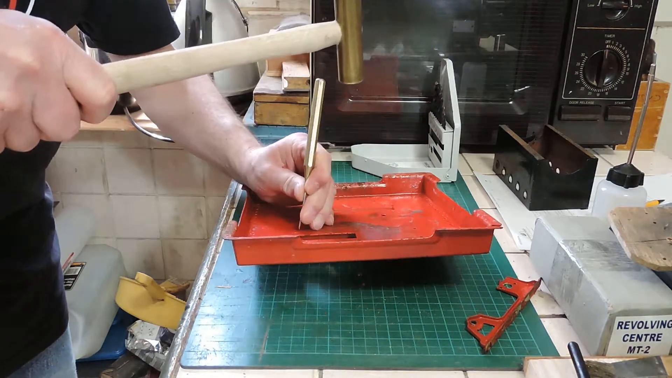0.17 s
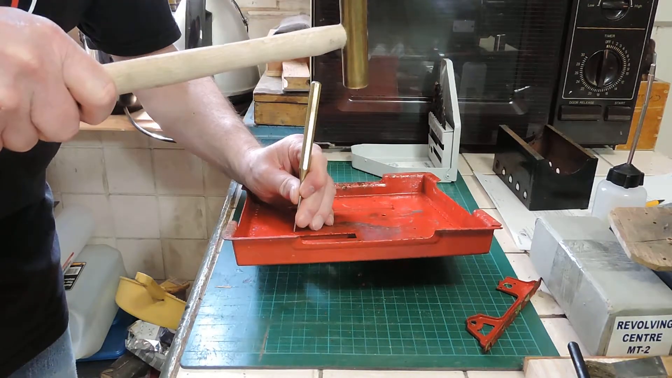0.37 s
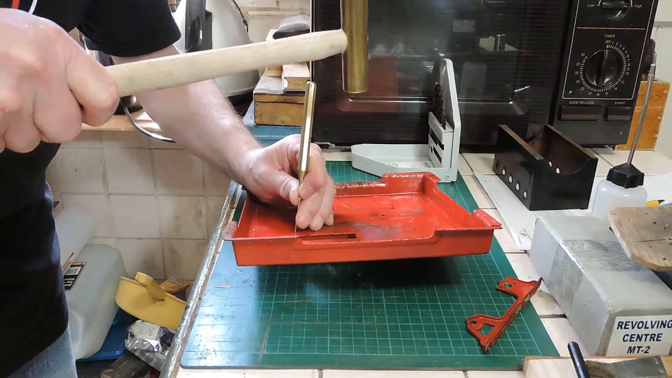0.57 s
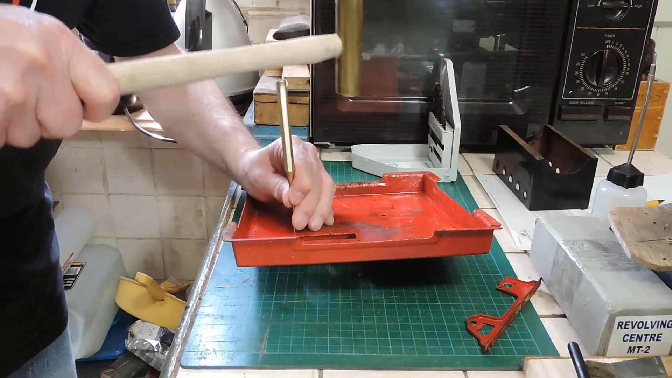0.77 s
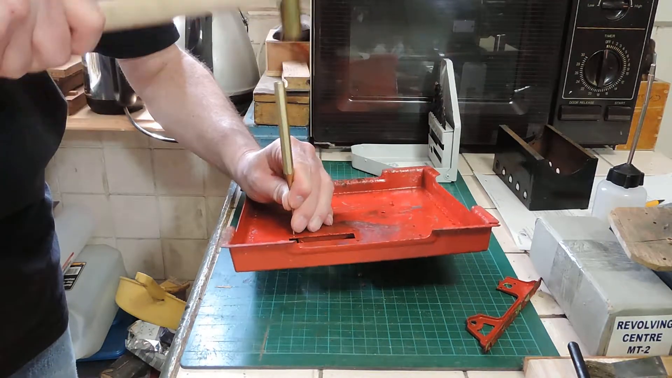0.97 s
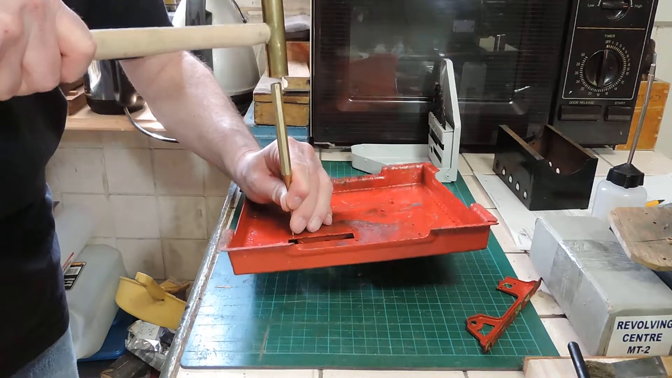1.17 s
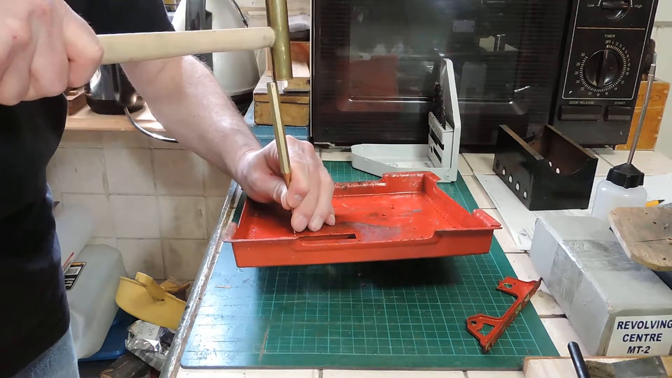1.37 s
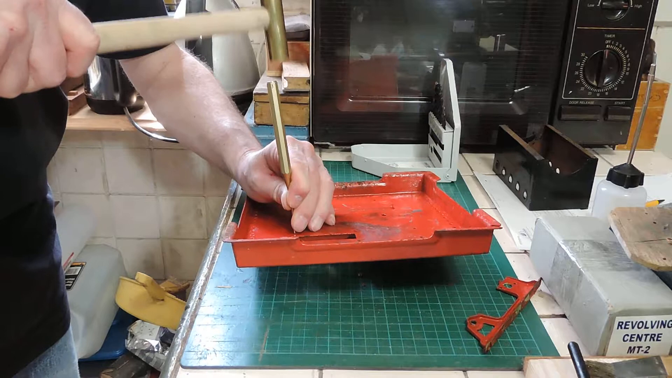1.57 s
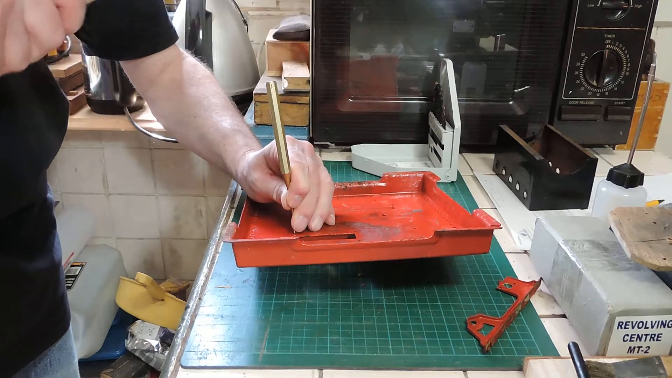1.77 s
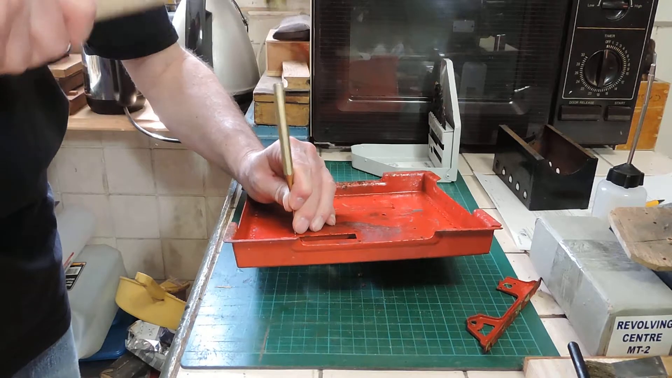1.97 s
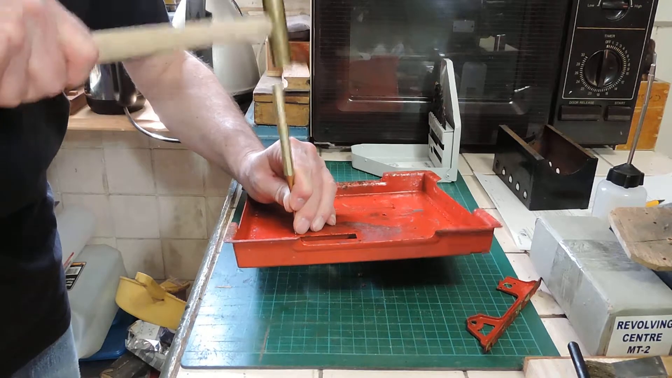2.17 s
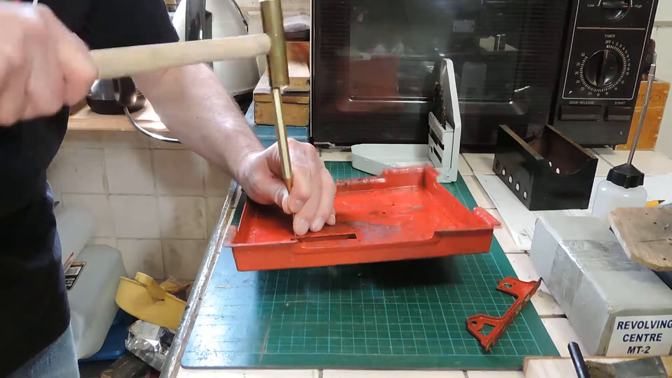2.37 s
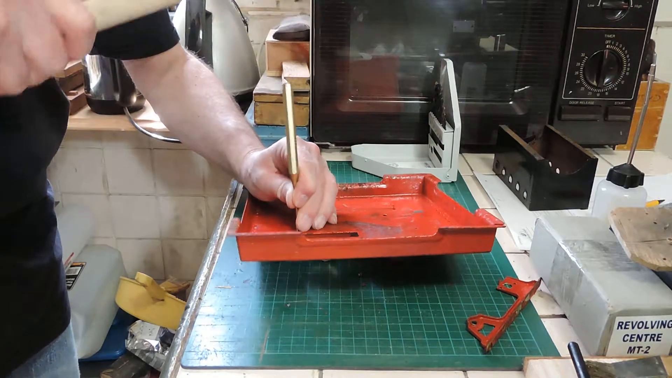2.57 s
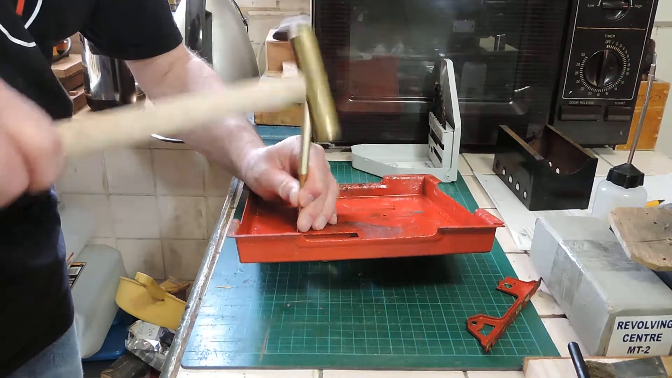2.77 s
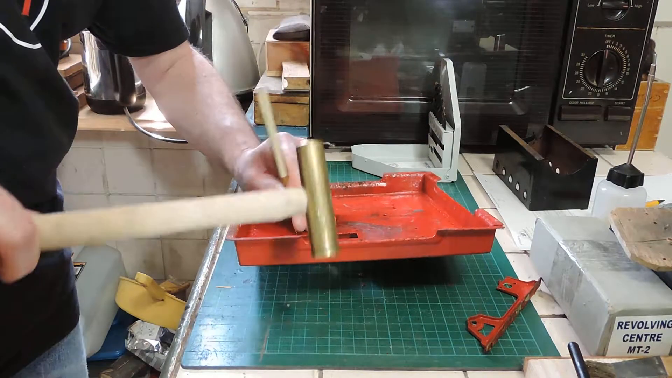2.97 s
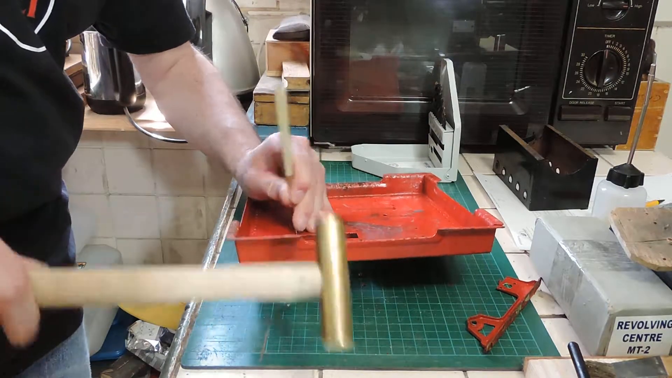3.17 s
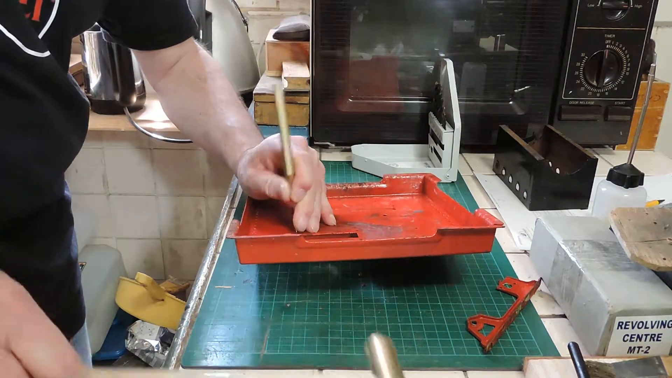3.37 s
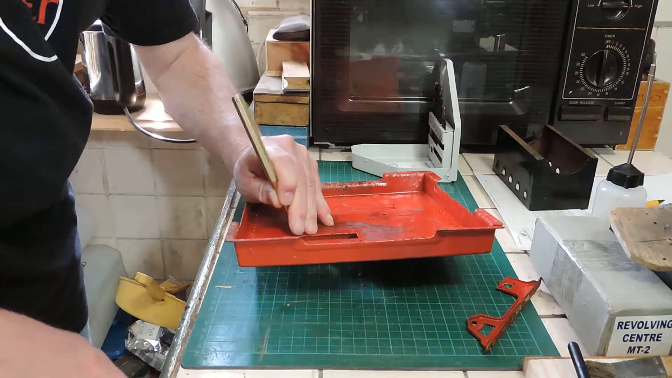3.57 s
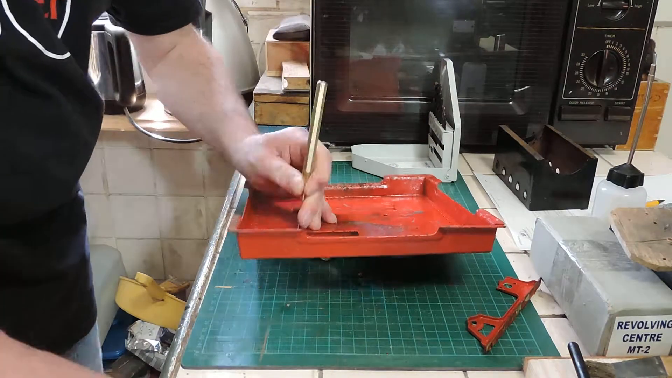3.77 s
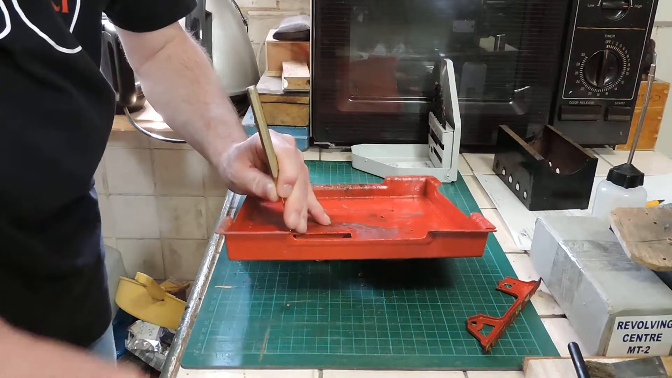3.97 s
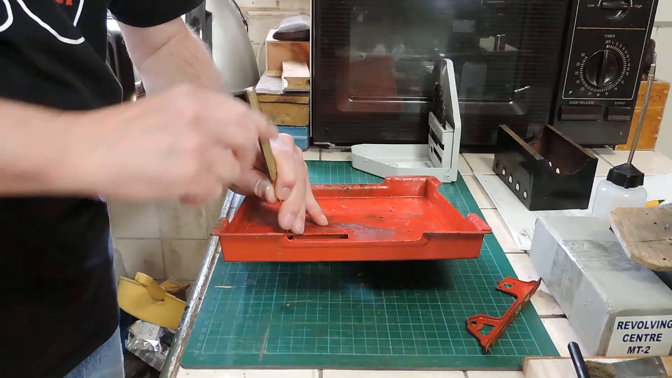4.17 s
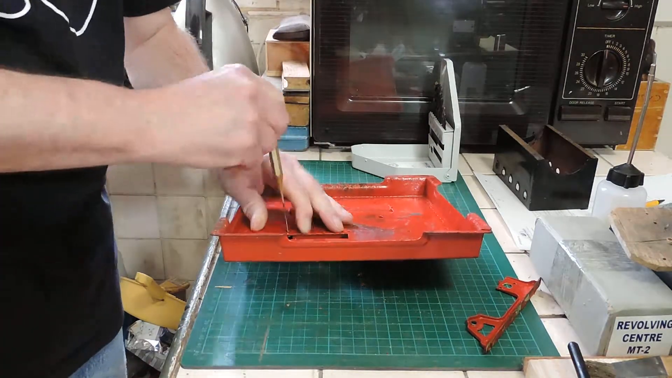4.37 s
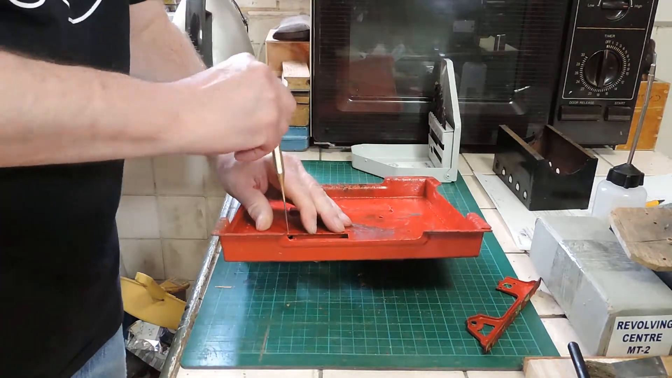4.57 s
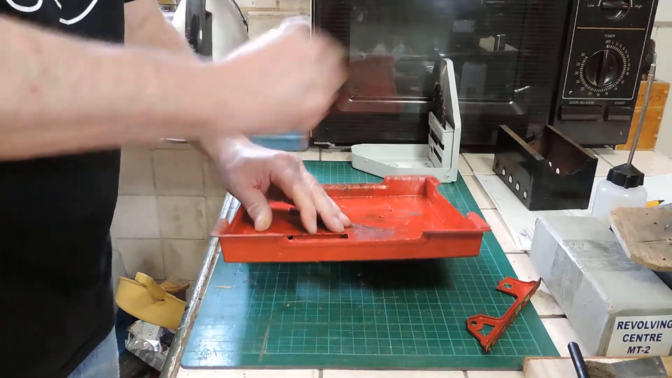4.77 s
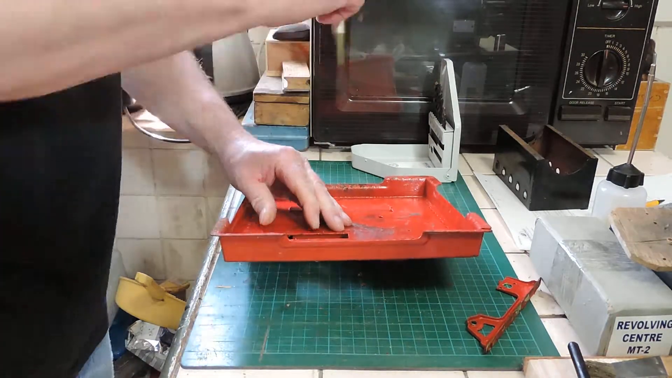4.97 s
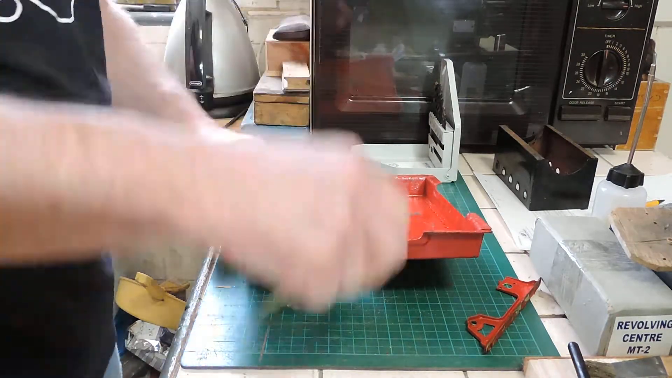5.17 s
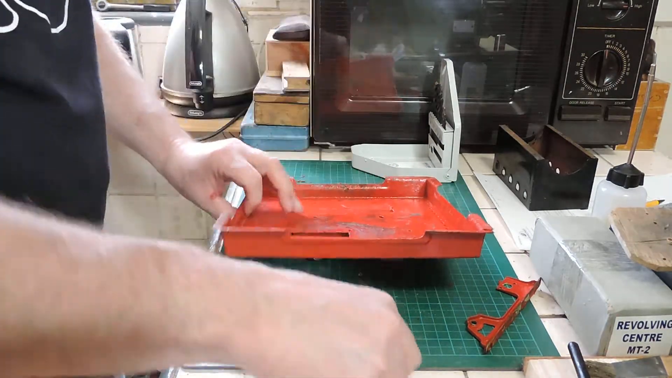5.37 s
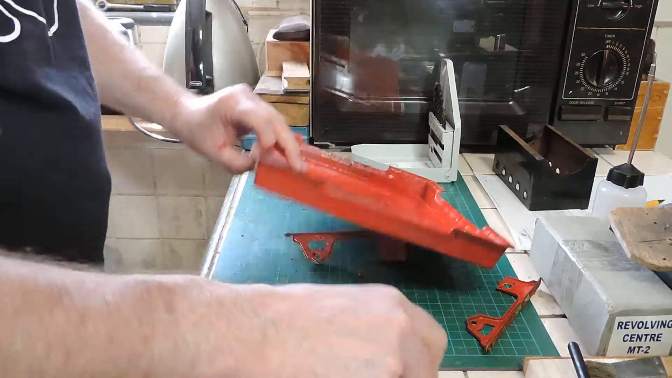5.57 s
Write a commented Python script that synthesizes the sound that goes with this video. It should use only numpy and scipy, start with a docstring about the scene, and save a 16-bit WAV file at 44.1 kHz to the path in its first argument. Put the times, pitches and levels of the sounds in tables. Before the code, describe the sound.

A close, slightly compressed camera pickup in a small workshop, with faint low rumble and soft hiss throughout. The first second is almost empty; a barely audible tick comes at 1.0 s and a light hammer tap on a punch at 1.4. Three hard blows follow at 2.0, 2.27 and 2.5 s: bright, clanging cracks with a noisy thin-metal tray rattle, short ring and quick room reflection, the last drier. The recording level ducks, then creeps back. Faint bumps at 3.2 lead to a loud, rapid cluster of hard tray knocks at 3.7-3.77 s. At about 4.14 s the hammer is laid down with a hollow, mid-low thunk and a brief follow-up clatter. Faint scrapes and small ticks run from 4.1 to 4.75. At 4.91 the tray drops on the mat, dull and boomy, with a second bump. From 5.52 s the loose punch bounces in thin, high, glassy clinks as rumble rises slightly.

```python
"""A tray knocks on a workshop bench, then a hammer taps a punch once lightly and three times hard to drive a rivet out.
The tray knocks as the punch is worked loose, the hammer is laid down, metal scrapes, the freed tray drops
on a mat, and the punch clinks down. Bursts of noise ring the metal parts, and a small room answers.
Rumble and hiss run throughout; the camera's gain sinks after loud treble and creeps back."""
import sys
import numpy as np
from scipy import signal
from scipy.fft import rfft, irfft, next_fast_len
from scipy.io import wavfile
from scipy.ndimage import uniform_filter1d, minimum_filter1d

SR = 44100
rng = np.random.default_rng(int(sys.argv[2]) if len(sys.argv) > 2 else 0)


def store_pcm(level_fs):
    """Save levels as 16-bit WAV."""
    pcm = np.round(np.clip(level_fs, -1, 1) * 32767).astype(np.int16)
    wavfile.write(sys.argv[1], SR, np.atleast_2d(pcm).T)


N = 246958
AGE = np.arange(SR // 2) / SR  # time since a contact began [s]
# ringing tones of the tray: (frequency [Hz], relative level [dB])
TRAY_TONES = [(124, 1), (150, -1), (215, -4), (312, -3), (400, -4), (485, -1), (580, -4), (796, 1),
              (846, 0), (1126, 4), (1198, 1), (1308, 1), (1402, 4), (1470, 2), (1620, -3), (1730, 1),
              (2020, 1), (2470, 0), (2715, -2), (3000, -2), (3321, -8)]


def amp(db):
    """Turn decibels into a gain factor."""
    return 10 ** (np.asarray(db) / 20)


def unit(x):
    """Scale a sound to an rms level of 1."""
    return x / np.sqrt(np.mean(x ** 2) + 1e-20)


def unit_attack(x):
    """Scale a hit so that its first 40 ms have an rms level of 1."""
    attack = x[..., :SR // 25]
    return x / np.sqrt(np.mean(attack ** 2) + 1e-20)


def along(points, hz):
    """Read a curve of (frequency, value) points, with straight lines on a log frequency axis."""
    point_hz, values = np.transpose(points)
    return np.interp(np.log(hz + 1), np.log(point_hz), values)


def fade(t60):
    """A dying-away curve that loses 60 dB in t60 seconds."""
    return np.exp(-np.log(1000) * AGE / max(t60, 1e-4))


def add(track, s, sound):
    """Mix a sound into the track, starting at s seconds."""
    space = track[:, round(s * SR):][:, :sound.shape[1]]
    space += sound[:, :space.shape[1]]


def through(x, response):
    """Pass each channel through an impulse response."""
    return signal.fftconvolve(x, response[None], axes=1)[:, :x.shape[1]]


def colour(spectrum, size=8192):
    """Build an impulse response with the wanted gain at each frequency and no sound before the hit."""
    gain = amp(along(spectrum, np.fft.rfftfreq(size, 1 / SR)))
    # folding the cepstrum (spectrum of the log gain) gathers the energy at the start
    cepstrum = irfft(np.log(gain))
    cepstrum[1:size // 2] *= 2
    cepstrum[size // 2 + 1:] = 0
    return irfft(np.exp(rfft(cepstrum)))[:size // 2]


def resonator(modes, t60):
    """Ring like struck metal or a mat: a sum of sine tones that die away together."""
    age = AGE[:SR // 6]
    tones = sum(amp(db) * np.sin(2 * np.pi * hz * age) for hz, db in modes)
    return tones * fade(t60)[:len(age)]


def diffuse(size):
    """White stereo noise whose channels differ by an amount that depends on frequency."""
    # stereo width: (frequency [Hz], side over middle [dB])
    stereo_width = [(60, -4), (150, -10.5), (600, -8), (1200, -4.5), (3000, 0), (10000, -1.5)]
    m = next_fast_len(size)
    mid, side = rng.standard_normal((2, m))
    side_gain = amp(along(stereo_width, np.fft.rfftfreq(m, 1 / SR)))
    side = irfft(rfft(side) * side_gain, m)
    return unit(np.array([mid + side, mid - side])[:, :size])


def room_tail():
    """The room's answer: it builds in a few ms and each frequency dies at its own speed."""
    # room decay: (frequency [Hz], time to lose 60 dB [s])
    room_decay = [(100, 0.43), (400, 0.27), (1500, 0.28), (5000, 0.26), (14000, 0.28)]
    hz, t, grains = signal.stft(diffuse(len(AGE)), SR, nperseg=256)
    decay = np.exp(-np.log(1000) * t / along(room_decay, hz)[:, None])
    tail = signal.istft(grains * decay, SR, nperseg=256)[1]
    return tail[:, :len(AGE)] * (1 - fade(0.006))


def contact(rattle_t60, crack_db, room_db):
    """The push of a contact: a sharp noise crack, a dense noisy rattle and the room's answer."""
    crack = amp(crack_db) * fade(0.0055) * rng.standard_normal(len(AGE))
    rattle = fade(rattle_t60) * diffuse(len(AGE))
    return crack + rattle + amp(room_db) * room_tail()


def cushioned(hit, db):
    """A weak contact lasts longer and is duller: its treble rolls off from a lower frequency."""
    # 8730 Hz at a level of 0 dB, and an octave lower for every 18 dB weaker
    corner_hz = np.clip(8730 * 2 ** (db / 18), 500, 16000)
    return signal.sosfilt(signal.butter(2, corner_hz, fs=SR, output='sos'), hit)


def voiced(hit, thud_db, edge_db, sizzle_db):
    """A heavy contact adds thud, a hard one edge and sizzle, relative to the middle band."""
    # thud, middle, edge and sizzle bands: (lowest frequency [Hz], highest frequency [Hz])
    band_edges = [(30, 350), (350, 3800), (3800, 9000), (9000, 17000)]
    out = 0
    for edges, db in zip(band_edges, (thud_db, 0, edge_db, sizzle_db)):
        band = signal.sosfilt(signal.butter(4, edges, 'band', fs=SR, output='sos'), hit)
        out = out + amp(db) * unit_attack(band)
    return out


def room_tone():
    """Filtered noise: low rumble, a little to the right and of changing level, with soft steady hiss."""
    # strength of the rumble: (time [s], level [dB])
    rumble_levels = [(0, -57), (1.499, -57), (4.102, -55), (4.7, -57), (5.6, -47)]
    # tone colours of rumble and hiss: (frequency [Hz], relative gain [dB])
    rumble_colour = [(11, -37.5), (18, 13.5), (43, 4.5), (54, 3), (70, -19), (160, -10), (210, -42.5),
                     (350, -120)]
    hiss_colour = [(59, -29.5), (100, -4.5), (156, -8), (197, -1), (322, -12.5), (595, -12), (691, -12),
                   (836, -14), (1480, -16), (3190, -24), (13200, -35), (16000, -40)]
    rumble_db = np.interp(np.arange(N) / SR, *np.transpose(rumble_levels))
    rumble = amp(rumble_db) * unit(through(diffuse(N), colour(rumble_colour)))
    rumble = rumble * amp([[-1.3], [1.3]])  # left, right [dB]
    hiss = amp(-58) * unit(through(diffuse(N), colour(hiss_colour)))
    return rumble + hiss


def scraping():
    """Metal slides on the tray as the punch is turned and drawn out: short swells of hissing noise."""
    # slides: (time of the strongest moment [s], length [s], level [dB])
    slides = [(4.106, 0.021, -49), (4.454, 0.027, -61), (4.544, 0.1, -55), (4.652, .04, -59.5),
              (5.206, 0.062, -62)]
    # tone colour: (frequency [Hz], relative gain [dB])
    slide_colour = [(1000, 6.5), (3000, 0.5), (7000, -5.5), (14000, 0.5), (16000, -10.5)]
    t = np.arange(N) / SR
    stroke = sum(amp(db) * np.exp(-(2 * (t - s) / length) ** 2) for s, length, db in slides)
    return stroke * unit(through(diffuse(N), colour(slide_colour)))


def knocks(events, spectrum, modes, ring_db, ring_t60, rattle_t60, crack_db, room_db, sizzle_db):
    """One object knocks once for each row: a noisy clatter plus its ring, brighter when harder."""
    out = np.zeros((2, N))
    clatter, body = colour(spectrum), resonator(modes, ring_t60)
    for s, db, thud_db, hard_db in events:
        push = contact(rattle_t60, crack_db, room_db)
        ring = amp(ring_db) * unit_attack(through(push, body))
        hit = unit_attack(through(push, clatter)) + ring
        add(out, s, amp(db) * voiced(cushioned(hit, db), thud_db, hard_db, hard_db + sizzle_db))
    return out


def tray_knocks():
    """The tray knocks on punch and bench, each contact ringing its metal."""
    # knocks: (time [s], level [dB], thud [dB], hardness [dB])
    tray_hits = [(1.032, -56.5, -6, -4.5), (1.605, -61.5, 0.5, -26), (3.141, -58, 3, -18),
                 (3.194, -45.5, 3.5, -23), (3.579, -55.5, 3, -16), (3.704, -15.5, -17, -12.5),
                 (3.7145, -15.5, -20.5, -21.5), (3.7245, -20, -10, -9.5), (3.7305, -5, -27, -16),
                 (3.766, -17.5, -32, -24), (3.869, -40.5, 3.5, -18), (3.949, -46.5, 2.5, -41.5),
                 (4.442, -56.5, 1, -14.5), (4.549, -51, 0.5, -6), (4.604, -57, 7.5, -22),
                 (4.684, -48, 8.5, -17.5), (4.745, -52.5, -1, -22), (5.5465, -42, 4, -28),
                 (5.559, -45, 2, -23)]
    # tone colour: (frequency [Hz], relative gain [dB])
    tray_colour = [(35, -62.5), (60, -0.5), (159, -5), (421, -15.5), (566, -2), (700, -12), (952, -4.5),
                   (1430, -3.5), (1760, -1), (2800, -5), (3600, -16.5), (4600, -24), (5600, -11.5),
                   (7200, -26), (8600, -26.5), (12100, -28), (13500, -26.5)]
    return knocks(tray_hits, tray_colour, TRAY_TONES, ring_db=-5.5, ring_t60=0.13,
                  rattle_t60=0.056, crack_db=10.0, room_db=-7, sizzle_db=-8.5)


def hammer_laid_down():
    """The hammer is laid down, head then handle, with a short ring."""
    # contacts: (time [s], level [dB], thud [dB], hardness [dB])
    hammer_hits = [(4.1375, -31.5, -13.5, -9.5), (4.1415, -21, -20.5, -37), (4.174, -29, -38.5, -22),
                   (4.192, -33, -30, -25)]
    # tone colour: (frequency [Hz], relative gain [dB])
    hammer_colour = [(47, -71), (80, -43), (129, -2), (263, -13), (348, -10), (597, -4.5), (651, 0.5),
                     (1510, -14.5), (2650, -16.5), (3750, -33), (8520, -30.5), (14000, -41)]
    # ringing tones: (frequency [Hz], relative level [dB])
    hammer_tones = [(413, -19), (475, -11), (646, 21), (713, -2), (820, 1), (876, -6.5), (1110, -2),
                    (2330, 4)]
    return knocks(hammer_hits, hammer_colour, hammer_tones, ring_db=-9, ring_t60=0.025,
                  rattle_t60=0.093, crack_db=4.5, room_db=-4.5, sizzle_db=-27)


def tray_drops():
    """The freed tray drops on the mat, which booms briefly."""
    # contacts: (time [s], level [dB], thud [dB], hardness [dB])
    drop_hits = [(4.909, -43.5, -2, -17), (4.915, -30.5, 1, -27), (4.9575, -31, -2, -22)]
    # tone colour: (frequency [Hz], relative gain [dB])
    drop_colour = [(25, -42), (45, 2), (110, 6.5), (300, -8), (520, -11.5), (1100, -19), (1800, -15),
                   (3000, -30), (14000, -42)]
    # ringing tones of the mat: (frequency [Hz], relative level [dB])
    mat_tones = [(85, 3), (124, 0), (215, -7), (370, -6), (510, -8), (577, -7), (800, -7), (962, 3),
                 (1110, -3), (1665, -12), (1850, -14)]
    return knocks(drop_hits, drop_colour, mat_tones, ring_db=-2.5, ring_t60=0.05,
                  rattle_t60=0.14, crack_db=17.5, room_db=-0.5, sizzle_db=-7)


def punch_laid_down():
    """No longer held, the punch rings longer and more clearly as it bounces on the bench."""
    # clinks: (time [s], level [dB])
    clinks = [(5.522, -30), (5.542, -33), (5.5555, -37), (5.573, -31), (5.588, -35)]
    # tone colour of the tick: (frequency [Hz], relative gain [dB])
    tick_colour = [(880, -84), (2400, -43), (3280, -3.5), (7980, -14.5), (9510, -6), (11800, -3),
                   (13500, 0), (15500, -28.5)]
    # ringing tones of the loose punch: (frequency [Hz], relative level [dB])
    loose_tones = [(3180, 1), (3420, -3), (4264, -6), (4990, -5), (5510, -2.5), (6514, -14), (7500, -7),
                   (9820, 1.5), (10500, -3), (11080, 8.5), (12660, 3), (12900, 3), (13890, 10.5),
                   (14390, -7)]
    click, punch = colour(tick_colour), resonator(loose_tones, t60=0.13)
    out = np.zeros((2, N))
    for s, db in clinks:
        push = contact(rattle_t60=0.04, crack_db=-1, room_db=-15.5)
        tick = amp(-16.5) * unit_attack(through(push, click))
        ring = amp(-9.5) * unit_attack(through(push, punch))
        add(out, s, amp(db) * (tick + ring))
    return out


def hammering():
    """Each blow rings the held punch and sets the tray rattling under it."""
    # blows: (time [s], level [dB], thud [dB], edge [dB], sizzle [dB], punch ring [dB],
    #         time for the rattle to lose 60 dB [s])
    blows = [(1.390, -30.5, -7, -23.5, -33, -15.5, 0.29), (2.0139, 5.5, -14, -7, -7, -15, 0.24),
             (2.2662, 2.5, -8, -5.5, -4.5, -4.5, 0.23), (2.5044, -1.5, -9, -5, -3, -16, 0.13)]
    # tone colour of the clatter: (frequency [Hz], relative gain [dB])
    blow_colour = [(29, -42), (50, -10), (90, -3), (150, 6), (298, -12), (418, -19.5), (545, -2.5),
                   (746, -11), (822, 7.5), (927, -2), (1400, 3.5), (2750, -7), (3250, -12.5), (6390, -17),
                   (14500, -14.5), (16000, -20.5)]
    # ringing tones of the held punch: (frequency [Hz], relative level [dB])
    held_tones = [(3150, -12.5), (3320, -13.5), (4350, -28), (5520, -28), (6728, -17.5), (7850, -24.5),
                  (8680, -16.5), (11400, -21.5), (12400, -16), (13700, -19), (14763, 0)]
    clatter = colour(blow_colour)
    tray, punch = resonator(TRAY_TONES, t60=0.066), resonator(held_tones, t60=0.06)
    out = np.zeros((2, N))
    for s, db, thud_db, edge_db, sizzle_db, punch_db, rattle_t60 in blows:
        # the punch seats itself first, so the force takes a moment to build
        push = contact(rattle_t60, crack_db=-1, room_db=-10) * (1 - fade(0.015))
        parts = [(clatter, 0), (tray, -4), (punch, punch_db)]
        hit = sum(amp(part_db) * unit_attack(through(push, part)) for part, part_db in parts)
        add(out, s, amp(db) * voiced(hit, thud_db, edge_db, sizzle_db))
    return out


def scene():
    """Everything on the bench, in the room."""
    handling = tray_knocks() + hammer_laid_down() + tray_drops() + punch_laid_down()
    return room_tone() + scraping() + handling + hammering()


def gain_control(x, size=128):
    """Loud treble at the output drives the gain down quickly; it then recovers slowly."""
    sense_hz, threshold_db, knee_db = 4000, -31.5, 4.5  # it listens to the treble above sense_hz
    attack_db_per_s = 376.5  # full downward push, working against the recovery
    release_db_per_s, release_s = 13, 1.35  # a steady creep back, and faster from a deep cut
    cut_db = 11  # the gain is already down at the start
    treble = signal.sosfilt(signal.butter(2, sense_hz, 'high', fs=SR, output='sos'), x)
    power = np.abs(uniform_filter1d(np.mean(treble ** 2, axis=0), size=size))[::size]
    cuts = []
    for level_db in 10 * np.log10(power + 1e-14):
        drive = np.clip((level_db - cut_db - threshold_db) / knee_db, 0, 1)
        slope = attack_db_per_s * drive - release_db_per_s - cut_db / release_s
        cut_db = max(0, cut_db + slope * size / SR)
        cuts.append(cut_db)
    smooth_cut_db = np.interp(np.arange(N) / size, np.arange(len(cuts)), cuts)
    return x * amp(-smooth_cut_db)


def limiter(x, ceiling_db, hold_s):
    """Turn the gain down around moments when the short-term level is over the ceiling."""
    power = np.abs(uniform_filter1d(np.mean(x ** 2, axis=0), size=128))
    needed = np.minimum(1, amp(ceiling_db) / np.sqrt(power + 1e-12))
    held = minimum_filter1d(needed, max(int(hold_s * SR), 1))
    return x * uniform_filter1d(held, size=128)


def record(dry):
    """The camera rides its gain and limits what is still too loud; a steep low-pass leaves nothing above about 15.5 kHz."""
    limited = limiter(gain_control(dry), ceiling_db=-13.0, hold_s=0.002)
    low_pass = signal.cheby1(12, 0.2, 15500, fs=SR, output='sos')  # ripple [dB], top frequency [Hz]
    return signal.sosfilt(low_pass, limited)


dry = scene()
out = record(dry)
store_pcm(out)
```